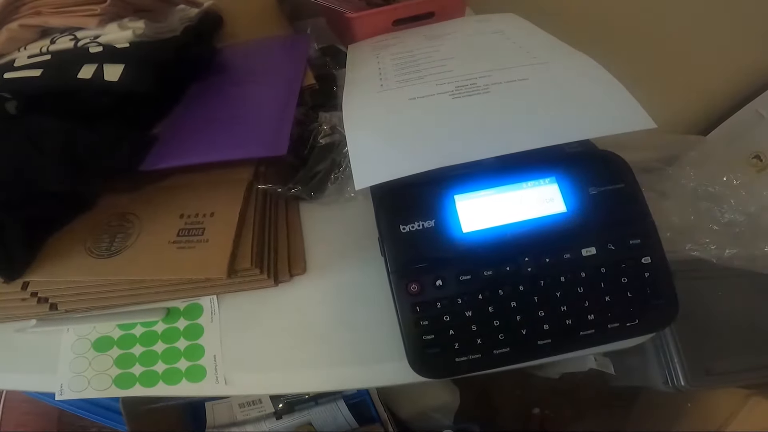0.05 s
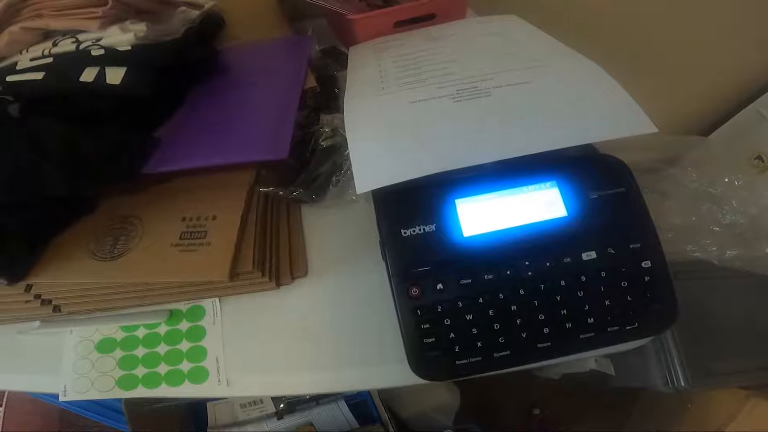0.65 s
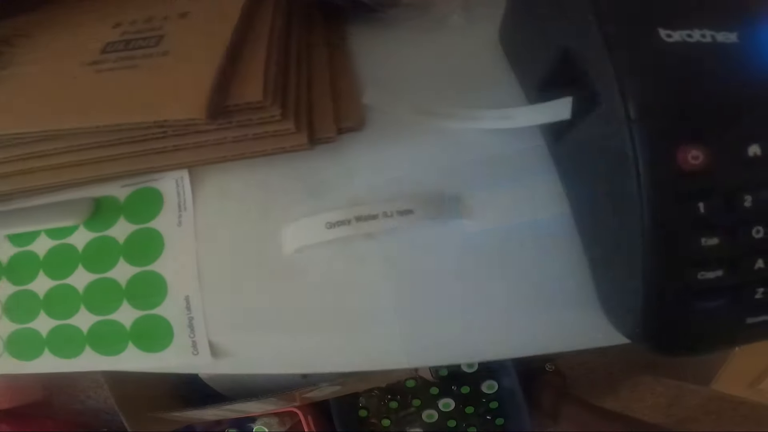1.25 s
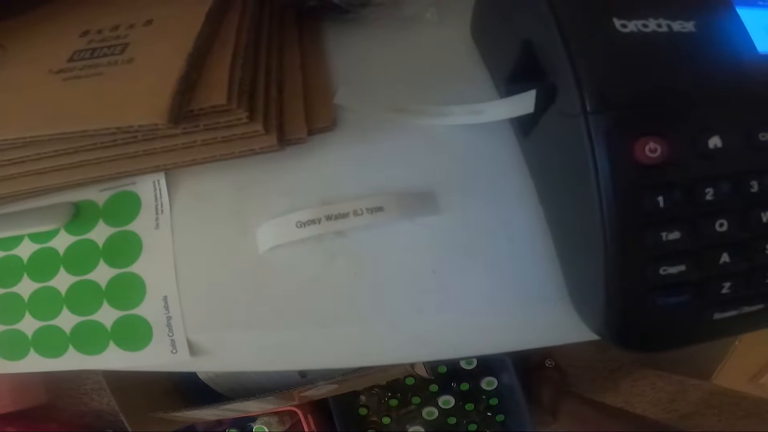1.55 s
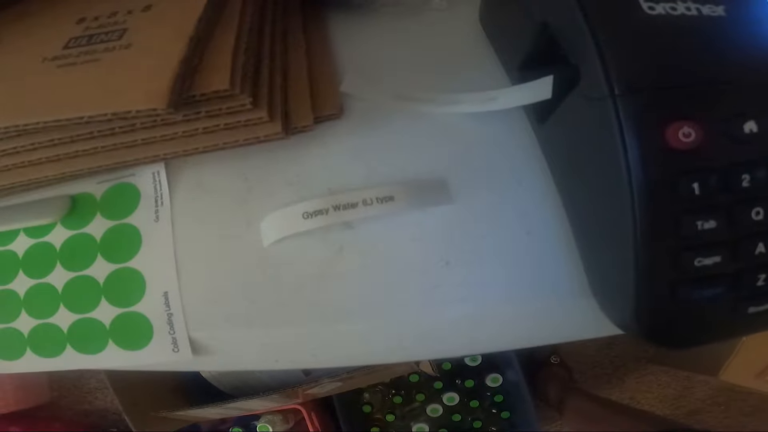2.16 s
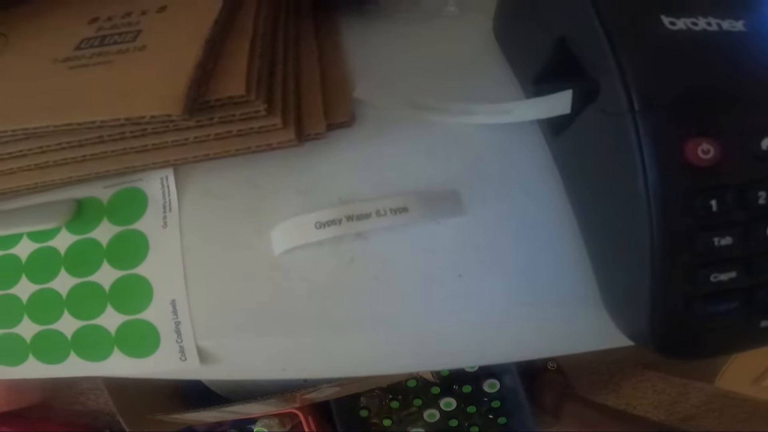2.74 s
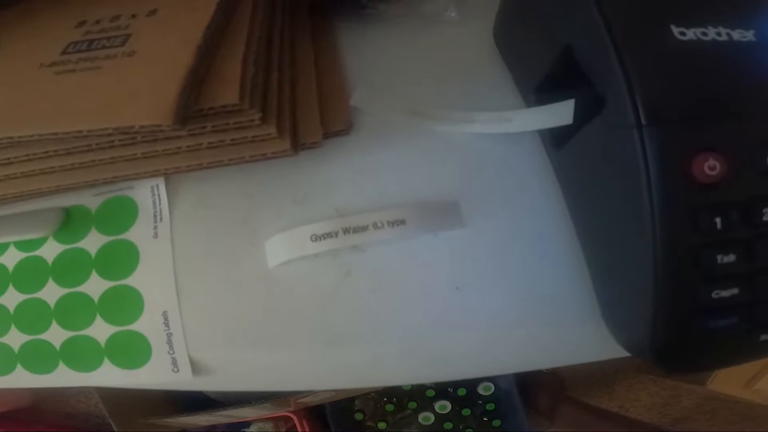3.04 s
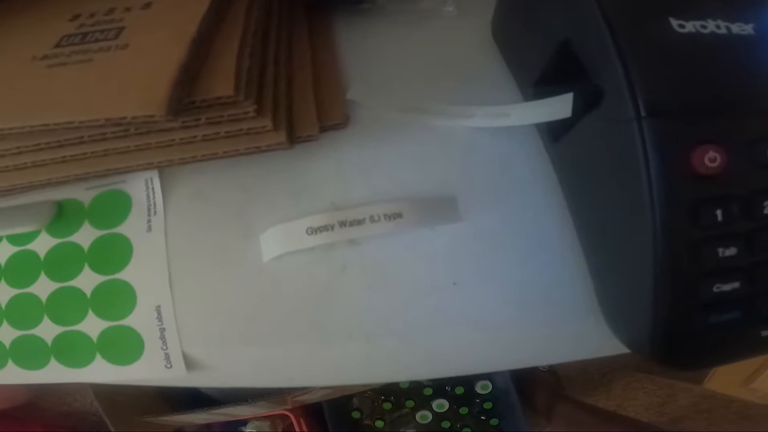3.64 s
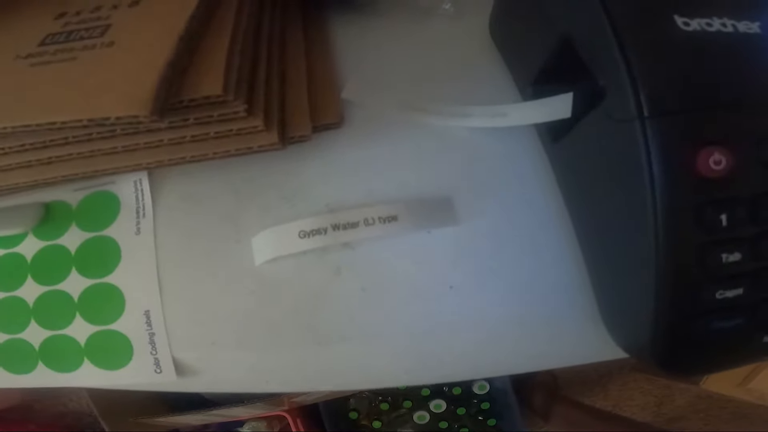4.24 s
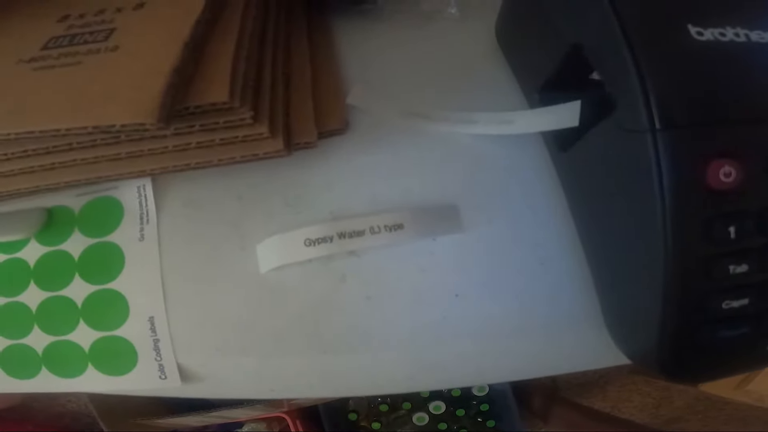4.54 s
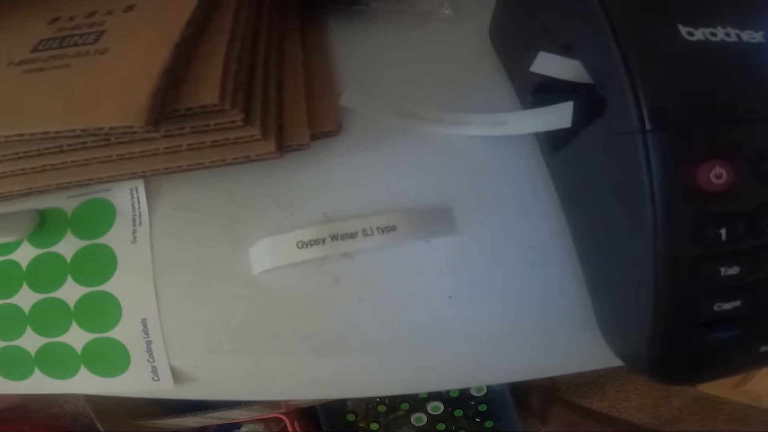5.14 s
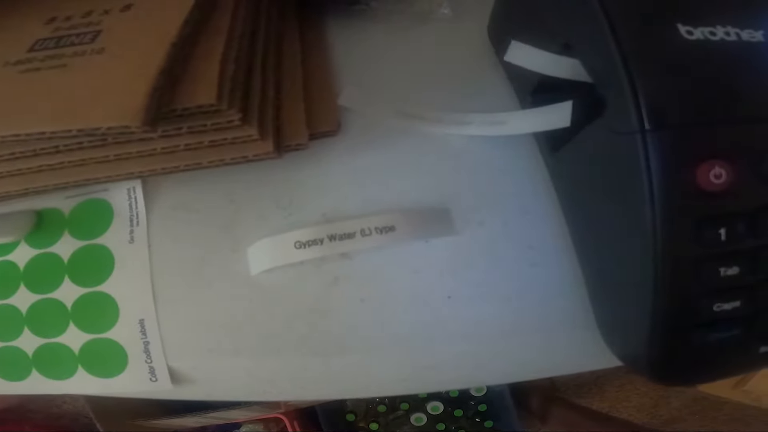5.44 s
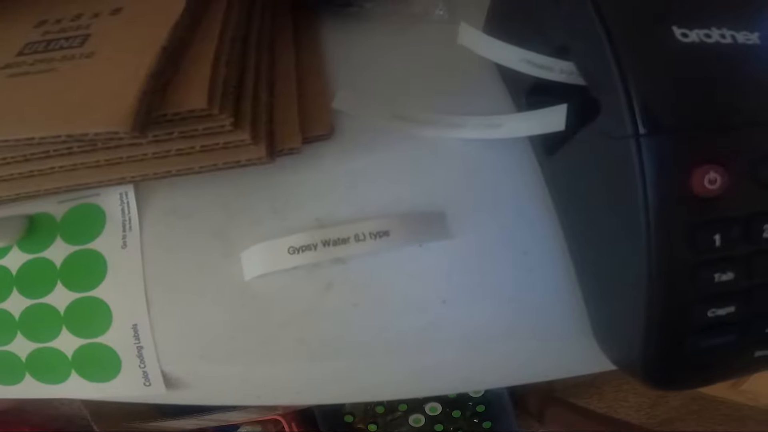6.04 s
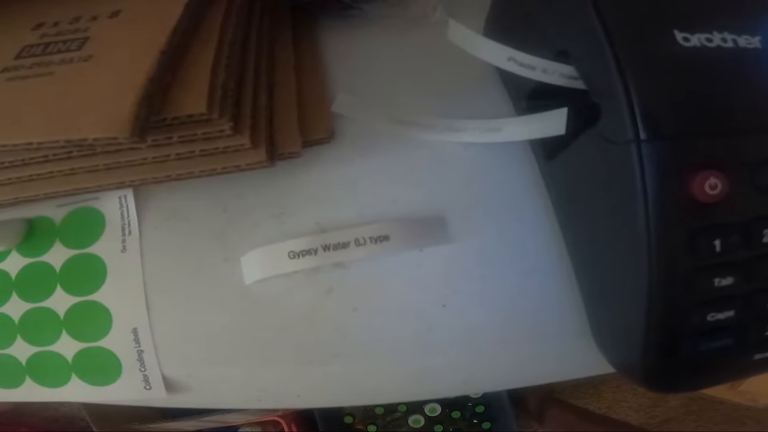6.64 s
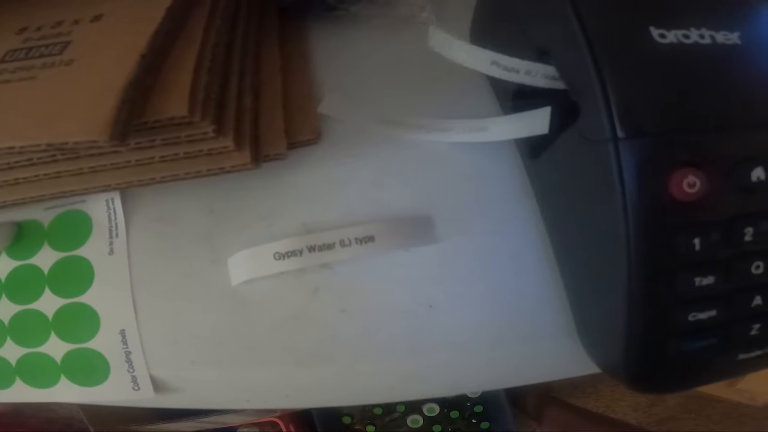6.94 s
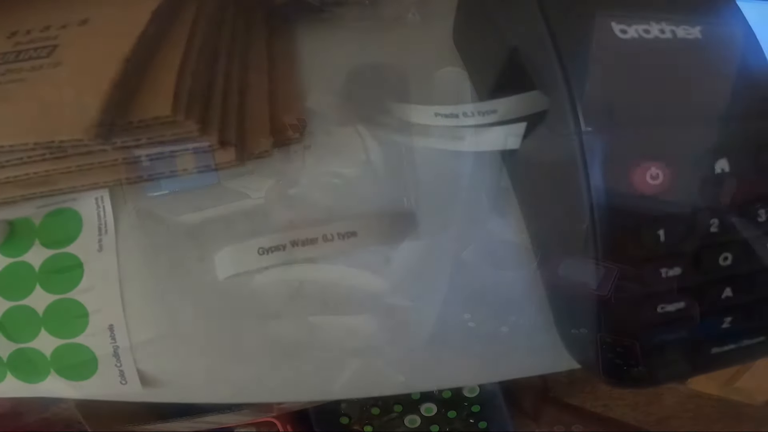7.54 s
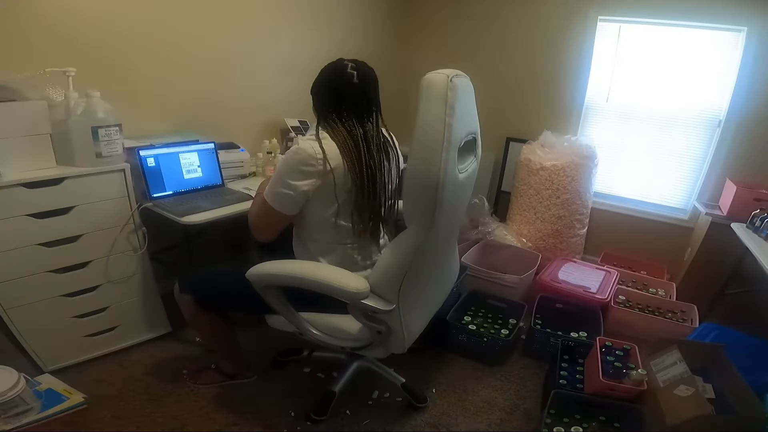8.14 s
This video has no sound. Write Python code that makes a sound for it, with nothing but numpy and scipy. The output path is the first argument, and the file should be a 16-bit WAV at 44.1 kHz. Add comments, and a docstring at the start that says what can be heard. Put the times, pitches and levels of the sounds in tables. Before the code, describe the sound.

After a click and two key presses, a label printer's motor whines steadily, then its cutter whirrs, squeaks and snaps through the tape.

```python
"""A desk in a small room, with a label printer on it. After a rustle and a sharp click, a key is pressed
and let go twice, thumping through case and desk. A stepper motor (one that turns in tiny steps) whines
the tape out, a little higher over the blank gaps. Then a geared motor whirrs the cutter along, and the
blade squeals through the tape and snaps back. A last rustle follows, over the faint air of the room."""
import sys
import numpy as np
from scipy import signal
from scipy.fft import rfft, irfft, next_fast_len
from scipy.io import wavfile

SR = 44100
rng = np.random.default_rng(int(sys.argv[2]) if len(sys.argv) > 2 else 0)


def output_pcm(signal):
    """Save a mono or channel-first signal as 16-bit PCM at the path in sys.argv[1].

    Samples are clipped to [-1, 1] before scaling.
    """
    pcm = np.clip(np.atleast_2d(signal).T, -1, 1) * 32767
    wavfile.write(sys.argv[1], SR, np.round(pcm).astype(np.int16))


N = 365588
T = np.arange(N) / SR

# the hiss of tape as it slides or tears: f/Hz, level/dB
TAPE_COLOUR = [(2940, -73), (5000, -1), (5490, -2.5), (5970, -2.5), (7680, -7), (8090, -10), (10000, -4),
               (10900, -13), (13600, -11.5), (15300, -40)]
PRESSES_S, RELEASES_S = [1.67, 2.265], [1.927, 2.529]   # the finger goes down and comes up
CUT_FROM_S, CUT_TO_S = 7.033, 7.099   # the blade goes through the tape


def feed():
    """The stepper sings one set of tones while printing, a higher one when free; gears and tape join in."""
    # the motor's tones under the print head's drag, and running free: f/Hz, level/dB
    print_tones = [(344.5, -62), (409.1, -59.5), (479.1, -59), (822.5, -49), (958.5, -58), (1438, -58),
                   (1647, -69), (2398.5, -47), (2878, -56), (3358, -61)]
    free_tones = [(425.3, -59), (495.3, -60), (822.5, -61), (990, -50.5), (1485, -47.5), (1696, -61.5),
                  (1976, -63.5), (2473, -51.5), (2967, -45.5), (3462, -54)]
    # blank stretches of the label, where the motor runs free: start/s, end/s
    blanks = [(3.84, 3.91), (4.376, 4.497), (4.955, 5.085), (5.553, 5.668), (5.9, 6.075), (6.28, 6.45)]
    start_s, stop_s, first_catch_s, turn_s = 3.856, 6.362, 3.995, .1552
    free = during(blanks, ramp_s=.028)
    running = held(start_s, stop_s, rise_s=.0064, fall_s=.0048)
    fed = progress(start_s, stop_s)   # share of the label that is out
    # the gears catch once a turn: the motor is held back, then makes up the lost way
    from_catch = ((T - first_catch_s + turn_s / 2) % turn_s - turn_s / 2) / .009
    catch = np.exp(-from_catch ** 2)
    print_speed = 1 + .021 * from_catch * catch
    # it starts a little too fast and brakes at the end
    starting = np.exp(-((T - start_s) / .0251) ** 2)
    braking = progress(stop_s - .05, stop_s)
    free_speed = 1 + .0501 * starting - .61 * braking
    tones = (1 - free) * whine(print_tones, print_speed, wobble=.0011, flutter_db=1.3, choke=catch)
    tones += free * whine(free_tones, free_speed, wobble=.0008, flutter_db=1.3, choke=catch / 2 + 3 * braking)
    tones *= from_db(-9 * starting - 2.4 * braking)   # off its running speed the motor sings less
    return running * tones + gears_and_tape(running, free, fed, catch)


def gears_and_tape(running, free, fed, catch):
    """The motor's steps rattle the gears and their plate; these and the tape grow louder as it feeds."""
    # the rattle of the gears: f/Hz, level/dB
    gear_colour = [(130, -16.5), (340, -7), (560, -6), (740, -13), (850, -6.5), (1050, -3), (1300, -6.5),
                   (1780, -2), (2150, -7.5), (2650, -4.5), (2900, 1), (3250, 2), (3680, -9), (4450, -6),
                   (5600, -24), (9000, -36.5)]
    # where the plate that holds the gears rings: f/Hz, width/Hz, level/dB
    plate_peaks = [(354.8, 29.5, -5), (864.6, 53, -0.5), (947, 41, 0.5)]
    steps = rms_one(scuff(contacts(per_s=480, jitter=.02, uneven_db=3.5), t60=.016))
    ticks = rms_one(scuff(contacts(per_s=62, jitter=.08, uneven_db=3.5), t60=.016))
    slack = from_db(-3) * held(3.776, 3.793, rise_s=.0089, fall_s=.0095)   # the gears take up their play
    turning = (running + slack) * from_db(2.5 * fed)
    gears = from_db(-50.5 + 4.5 * catch) * colour(steps + .38 * ticks, gear_colour)
    plate = from_db(-56 + 3 * free) * resonate(steps, plate_peaks, flicker_db=3.5)
    tape = from_db(-67.3 + 8 * fed ** 2) * colour(steps + 1.1 * ticks, TAPE_COLOUR)
    return turning * (gears + plate) + running * tape


def cutter():
    """Each turn of the motor shakes the cutter's parts, harder under load; gear teeth add grit."""
    # where the gears, lever, cover and blade guide ring: f/Hz, width/Hz, level/dB
    gear_peaks = [(103, 19, -10.5), (210, 30, -9.5), (334, 135, 1.5), (428, 21, -4), (525, 144, -2.5),
                  (590, 24, -18)]
    lever_peaks = [(728, 75, 0), (838, 48, 0), (950, 86, 1), (1190, 71, -14)]
    cover_peaks = [(2040, 140, 0.5), (2570, 490, -6.5), (4450, 350, -2), (4820, 300, -1)]
    guide_peaks = [(1195, 99, 2), (1424, 160, 0.5), (2950, 380, -7), (4300, 160, -6), (7000, 380, -14)]
    # the hiss of parts rubbing: f/Hz, level/dB
    friction_colour = [(820, -5.5), (1400, -1.5), (1850, -3.5), (2280, -6.5), (2730, -5), (3270, -8.5),
                       (4930, -12), (7070, -22), (8380, -30), (12400, -30.5), (15300, -44)]
    # pressing the blade in, then drawing it back: start/s, end/s, load (0 to 1), rise/s, fall/s
    pushes = [(7.055, 7.105, .95, .028, .012), (7.35, 7.429, .6, .028, .33)]
    on_s, off_s, idle_share, draw_back_s = 6.692, 7.8, .36, pushes[1][0]
    # the motor idles, drives the lever there and back, then coasts to rest
    engaged = held(6.79, 7.77, rise_s=.021, fall_s=.069)
    effort = held(on_s, off_s, rise_s=.012, fall_s=.059) * (idle_share + (1 - idle_share) * engaged)
    load = sum(share * held(a, b, rise, fall) for a, b, share, rise, fall in pushes)
    rotor_hz = 105.55 * (1 - .12 * load ** 4 + .012 * drift(6))   # it slows under load
    turns = contacts(per_s=rotor_hz, jitter=.01, uneven_db=2.5)
    teeth = contacts(per_s=3 * rotor_hz, jitter=.03, uneven_db=3)
    drive = (rms_one(turns) + .8 * rms_one(scuff(teeth, t60=.012))) * from_db(1.5 * drift(45))
    gears = from_db(-48.5 + 7.5 * load) * resonate(drive, gear_peaks)
    lever = from_db(-56.5 + 18 * load + 1.9 * drift(13)) * resonate(drive, lever_peaks)
    tremble = rms_one(cut(rng.standard_normal(N), hz=65, kind="low", order=3))
    desk = from_db(-61) * held(draw_back_s, off_s, rise_s=.35, fall_s=.19) * tremble
    cover = from_db(-58) * resonate(drive, cover_peaks, flicker_db=2.5)
    friction = from_db(-53.5) * colour(scuff(teeth, t60=.037), friction_colour)
    going_in = held(on_s, CUT_TO_S, rise_s=.01, fall_s=.13)   # the blade holder scrapes along its guide
    scrape = from_db(-53.5) * going_in * resonate(drive, guide_peaks, flicker_db=3)
    whirr = from_db(4 * load) * (cover + friction + scrape)
    return effort ** 1.08 * (gears + lever) + effort * whirr + desk


def blade_squeal():
    """The blade sticks and slips in the tape, ever slower as the load grows; the film tears and crunches."""
    # the tones of the squeal: multiple of the pitch, level/dB
    partials = [(1, -17), (2, 0), (3, -2), (4, -24)]
    # where the blade rings: f/Hz, width/Hz, level/dB
    blade_peaks = [(343, 110, -4), (597, 300, -5.5), (1150, 230, 1.5), (1530, 170, -5.5), (1850, 200, -4.5),
                   (3300, 470, -14), (7060, 860, -18)]
    start_hz, sag_hz, sag_s, bite_s = 924, 136, .042, .012
    pitch = start_hz - sag_hz * (1 - np.exp(-np.maximum(T - CUT_FROM_S, 0) / sag_s))
    phase = 2 * np.pi * np.cumsum(pitch * (1 + .022 * drift(250))) / SR
    tone = from_db(4 * drift(200)) * sum(from_db(db) * np.sin(k * phase) for k, db in partials)
    tearing = scuff(contacts(per_s=170, jitter=.35, uneven_db=1.5), t60=.031)
    hiss = from_db(-12.5 + 5 * progress(CUT_FROM_S, CUT_TO_S) ** 3) * colour(tearing, TAPE_COLOUR)
    crunch = resonate(tearing, blade_peaks)
    squealing = held(CUT_FROM_S, CUT_FROM_S, rise_s=.011, fall_s=.14)
    squealing *= held(0, CUT_TO_S, rise_s=1, fall_s=.004)   # it stops when the film parts
    biting = held(CUT_FROM_S + bite_s, CUT_TO_S, rise_s=.026, fall_s=.0044)
    return from_db(-39.5) * (squealing * tone + biting * (hiss + crunch))


def blade_snap():
    """Small plastic parts crack against each other as the blade snaps back."""
    # each snap: t/s, level/dB, brightness/dB per octave
    hits = [(7.1, -25, -1), (7.179, -17, 2), (7.181, -23, -4), (7.1864, -24.5, -2), (7.2587, -27, 0)]
    # the notes of the small parts: f/Hz, level/dB, ring time/s
    modes = [(1490, -7.5, 0.011), (1879, -3.5, 0.018), (2470, -12, 0.013), (3050, -11, 0.011),
             (3760, -7.5, .013), (5170, -5, 0.012), (5900, -5, 0.0057), (7270, -4, 0.0076),
             (8930, -9, .0063)]
    return snaps(hits, modes, crack_db=-14, top_hz=12500)


def knocks():
    """Key blows and inner jolts ring the case and desk; the plastic ticks, and buzzes under the finger."""
    # the key lands, hits bottom, pushes the printer into the desk and springs back:
    # t/s, case level/dB, desk level/dB, tick level/dB, centre/Hz
    key_blows = [(1.667, -25.5, -43.5, -44.5, 400), (1.6715, -14, -36.5, -51.5, 220),
                 (1.684, -23, -42, -45.5, 400), (1.702, -38, -31, -61.5, 85), (1.728, -36, -33, -56, 60),
                 (1.9275, -8.5, -28, -32, 200), (2.268, -21, -39, -59, 330),
                 (2.285, -26.5, -42.5, -60, 380), (2.3, -36, -33, -65, 70), (2.529, -11, -27, -34, 185),
                 (2.564, -20, -34, -49, 200)]
    # gears take up, the feed bumps and stops, the cutter hits its end stop:
    # t/s, case level/dB, tick level/dB, centre/Hz
    jolts = [(3.746, -44.5, -50, 260), (3.772, -37.5, -50, 221), (5.401, -25, -47, 520),
             (6.371, -39, -63, 240), (7.1011, -14, -33, 340), (7.11, -22, -39, 450)]
    # the notes of the case and of the desk top: f/Hz, level/dB, ring time/s
    case_modes = [(151, -4.5, 0.068), (232, 1, 0.041), (264, -2, .07), (339, -4, 0.05), (493, -11.5, 0.043),
                  (554, -14, 0.055), (748, -15, 0.033), (1096, -9.5, 0.022)]
    desk_modes = [(36, 0, .3), (57, -3, 0.52), (75.7, 1, 0.4), (98.5, -2, 0.21), (139.3, 2, 0.2),
                  (189, -3, 0.18), (272.2, 2, 0.17)]
    # where loose plastic buzzes: f/Hz, width/Hz, level/dB
    buzz_peaks = [(910, 350, 2.5), (1800, 830, 3.5), (3000, 470, -5), (4800, 1000, -11)]
    jolt_desk_db = -74   # little of a jolt reaches the desk
    blows = key_blows + [(s, case, jolt_desk_db, tick, hz) for s, case, tick, hz in jolts]
    times, case_db, desk_db, tick_db, centre_hz = np.transpose(blows)

    def strike(modes, levels):
        """A blow rings the notes near its centre pitch most."""
        ringing = 0
        for k, (hz, db, t60) in enumerate(modes):
            strength = levels + db - 2.5 * np.log2(hz / centre_hz) ** 2 + rng.normal(0, 1, len(times))
            ringing += (-1) ** k * ring(clicks_at(times, strength), hz, t60)
        return ringing

    case = cut(strike(case_modes, case_db - 1.5), hz=124, kind="high", order=3)
    desk = strike(desk_modes, desk_db)
    force = cut(clicks_at(times, tick_db + 8), hz=90, kind="low", order=1)   # the key gives over a few ms
    ticks = cut(scuff(force, t60=.058), hz=5640, kind="low", order=5)
    ticks = .5 * ticks + cut(ticks, hz=1110, kind="low", order=1)   # a fingertip is a soft striker
    ticks = cut(ticks, hz=400, kind="high", order=2)
    buzz = from_db(-101.5) * resonate(scuff(clicks_at(times, .5 * case_db), t60=.3), buzz_peaks)
    return case + desk + ticks + buzz + finger_rub(buzz_peaks)


def finger_rub(peaks):
    """The fingertip taps the key just before each press, rubs as it sinks and again as it lifts."""
    touch = sum(held(s - .031, s - .031, rise_s=.001, fall_s=.0049) for s in PRESSES_S)
    down = sum(held(s + .011, s + .02, rise_s=.011, fall_s=.065) for s in PRESSES_S)
    up = sum(held(s, s, rise_s=.011, fall_s=.0325) for s in RELEASES_S)
    level = from_db(-63.5) * touch + from_db(-56.5) * down + from_db(-53.5) * up
    return level * resonate(rng.standard_normal(N), peaks)


def key_squeak(hz=5560, level_db=-59):
    """Plastic sticks and slips on plastic for a moment before the key springs back."""
    lifting = during([(s - .018, s) for s in RELEASES_S], ramp_s=.0055)
    return lifting * whine([(hz, level_db)], 1 + .025 * drift(400), wobble=.011, flutter_db=1.5)


def handling_clicks():
    """A plastic thing clicks and rings as it is handled."""
    # each click: t/s, level/dB, brightness/dB per octave
    hits = [(0.083, -49, 12), (0.802, -13.5, -1), (0.878, -47, 10), (0.9595, -56, -9)]
    # the notes of the thing: f/Hz, level/dB, ring time/s
    modes = [(138, -9, .1), (775, -16, .04), (1680, -8, .017), (2050, -12, .014), (2720, -6, .011),
             (3130, -9, 0.013), (4130, -3, 0.0099), (5600, -5, .009), (6750, -7.5, .007), (7200, -8, 0.012)]
    return snaps(hits, modes, crack_db=-22.5, top_hz=10000)


def rustles():
    """Light stuff, such as paper or cloth, slides in small clumps at the start and again at the end."""
    # the movements, one list for each rustle: start/s, end/s, level/dB
    moves = [
        [(0.0, 0.055, -57), (.13, .192, -59.5), (.787, .8, -58.5), (.885, 0.93, -67)],
        [(8.022, 8.06, -57.5), (8.21, 8.28, -65)],
    ]
    # the tone of each rustle: f/Hz, level/dB
    colours = [
        [(530, -27), (900, -11.5), (1870, -10.5), (3060, -1), (3870, -4), (7670, -2), (12000, -17.5),
         (15000, -29.5)],
        [(350, -34), (600, -7), (852, -9), (1310, 2), (3270, -9.5), (6340, -7.5), (11900, -24.5),
         (15000, -51.5)],
    ]
    sliding = sum(strokes(rows, rise_s=.015, fall_s=.013) * diffuse(spectrum)
                  for rows, spectrum in zip(moves, colours))
    return sliding * from_db(-2 + 2 * drift(120)) * pan(db=-.5)


def hand_bump():
    """A hand bumps the left of the microphone and shifts on it."""
    # the bump and the shift: start/s, end/s, level/dB
    moves = [(.806, .818, -28), (.97, 1.025, -44)]
    # their dull thud: f/Hz, level/dB
    thud_colour = [(25, -9.5), (55, 2), (90, -8.5), (140, 1.5), (215, -20), (420, -18), (570, -30.5),
                   (800, -26)]
    return from_db(-2.5) * strokes(moves, rise_s=.0061, fall_s=.019) * diffuse(thud_colour) * pan(db=6.5)


def air():
    """The room rumbles and hisses faintly, slowly swelling and sinking."""
    # how loud the air is: t/s, level/dB
    levels = [(0, -77), (1.4, -74), (2.7, -81), (6.5, -78.5), (8.29, -73.5)]
    # the low rumble and the hiss: f/Hz, level/dB
    rumble_colour = [(20, 2), (43, -2.5), (70, -12.5), (110, -21.5), (145, -1.5), (215, -1), (260, -9.5),
                     (340, -11.5), (800, -29)]
    hiss_colour = [(600, -4), (1400, -1.5), (2400, -10.5), (6800, -14.5), (9400, -27.5), (12000, -39)]
    level = from_db(np.interp(T, *np.transpose(levels)))
    return level * (from_db(12.5) * diffuse(rumble_colour) + diffuse(hiss_colour))


def room(x, wet_db):
    """The walls add a short echo that dies band by band; both ears hear nearly the same bass."""
    # how long the room rings: f/Hz, ring time/s
    ring_times = [(100, .4), (300, 0.16), (900, .3), (1900, 0.15), (5000, 0.29), (12000, .18)]
    t, tail = T[:SR // 2], 0
    edges = np.geomspace(60, 16000, 9)
    for low, high in zip(edges, edges[1:]):
        hz = np.sqrt(low * high)
        mid, side = band(rng.standard_normal((2, len(t))), low, high)
        fade = from_db(-60 * t / at_hz(ring_times, hz)) * (t > .003)
        width = hz / (hz + 700)
        ears = (mid + width * side * [[1], [-1]]) / np.hypot(1, width)
        tail += ears * fade / np.linalg.norm(fade)
    return x + from_db(wet_db) * signal.fftconvolve(x[None], tail, axes=1)[:, :N]


def whine(tones, speed, wobble, flutter_db, choke=0):
    """Tones share one uneven speed and each flutters in level; choking dims the high ones most."""
    clock = np.cumsum(speed + wobble * drift(30)) / SR
    total = 0
    for hz, db in tones:
        gain = from_db(db + flutter_db * drift(10.3) - 4.8 * choke * hz / 1000)
        total += np.sqrt(2) * gain * np.sin(2 * np.pi * (hz * clock + rng.random()))
    return total


def snaps(hits, modes, crack_db, top_hz):
    """Plastic snaps: a crack of noise and a few short notes, each hit with its own brightness."""
    times, level, tilt = np.transpose(hits)
    total = scuff(clicks_at(times, level + crack_db), t60=.012)
    for k, (hz, db, t60) in enumerate(modes):
        brightness = tilt * np.log2(max(hz, 1000) / 4000)
        strength = level - 5.5 + db + brightness + rng.normal(0, .93, len(times))
        total += (-1) ** k * ring(clicks_at(times, strength), hz, t60)
    return cut(total, hz=top_hz, kind="low", order=4)


def contacts(per_s, jitter, uneven_db):
    """Nearly regular clicks of uneven strength, as when gear teeth meet."""
    count = np.floor(np.cumsum(per_s * (1 + jitter * drift(40))) / SR)
    return (np.diff(count, prepend=0) > 0) * from_db(uneven_db * np.clip(rng.standard_normal(N), -2, 2))


def clicks_at(times, db):
    """Single clicks at given times and levels."""
    return np.bincount(np.round(times * SR).astype(int), from_db(db), N)[:N]


def scuff(clicks, t60):
    """Each click starts a puff of noise that fades by 60 dB in t60 seconds."""
    fade = signal.lfilter([1], [1, -from_db(-60 / (t60 * SR))], clicks + 1e-18)
    return fade * rng.standard_normal(N)


def ring(clicks, hz, t60):
    """Each click starts a pure note; its ring time t60 is the seconds it takes to fade by 60 dB."""
    decay, angle = from_db(-60 / (t60 * SR)), 2 * np.pi * hz / SR
    return signal.lfilter([0, np.sin(angle)], [1, -2 * decay * np.cos(angle), decay ** 2], clicks + 1e-18)


def resonate(x, peaks, flicker_db=0):
    """Keep the bands where a part rings; with flicker, each swells and fades by itself."""
    total = 0
    for hz, width, db in peaks:
        flicker = flicker_db * drift(12) if flicker_db else 0
        total += from_db(db + flicker) * band(x, hz - width / 2, hz + width / 2)
    return rms_one(total)


def diffuse(spectrum):
    """Noise from all around: alike in both ears in the bass, less so in the treble."""
    # how alike the two ears are: f/Hz, likeness (0 to 1)
    likeness = [(60, 1), (180, 0.39), (1640, 0.47), (4920, 0.26)]
    mid, side = rfft(rng.standard_normal((2, next_fast_len(N))))
    alike = np.clip(at_hz(likeness, np.linspace(0, SR / 2, len(mid))), 0, 1)
    ears = irfft(np.sqrt(1 + alike) * mid + np.sqrt(1 - alike) * side * [[1], [-1]])
    return colour(ears[:, :N], spectrum)


def colour(x, spectrum):
    """Shape a sound's lows and highs by a table, fading away beyond the table's ends."""
    size = next_fast_len(N)
    hz = np.arange(size // 2 + 1) * SR / size + .0013
    outside = np.maximum(1, np.maximum(spectrum[0][0] / hz, hz / spectrum[-1][0]))
    gain = from_db(at_hz(spectrum, hz)) / outside ** 2
    return rms_one(irfft(rfft(x, size) * gain, size)[..., :N])


def band(x, low, high):
    """Keep what lies between two frequencies."""
    return signal.sosfilt(signal.butter(2, [low, high], "band", fs=SR, output="sos"), x)


def cut(x, hz, kind, order):
    """Keep the "low" or the "high" side of a frequency."""
    return signal.sosfilt(signal.butter(order, hz, kind, fs=SR, output="sos"), x)


def drift(rate):
    """A smooth random wander of typical size 1; a higher rate wanders faster."""
    decay = np.exp(-80 * np.pi * rate / SR)
    slow = signal.lfilter([1], [1, -2 * decay, decay ** 2], rng.standard_normal(N // 40 + 2002))[2000:]
    return np.interp(np.arange(N) / 40, np.arange(len(slow)), rms_one(slow))


def held(start, stop, rise_s, fall_s):
    """A level that swells up to 1 at start, holds until stop and dies away."""
    return np.exp(-np.clip(np.maximum((start - T) / rise_s, (T - stop) / fall_s), 0, 30))


def strokes(rows, rise_s, fall_s):
    """One level curve with a swell for each row of start/s, end/s, level/dB."""
    return sum(from_db(db) * held(a, b, rise_s, fall_s) for a, b, db in rows)


def during(spans, ramp_s):
    """1 inside the spans, 0 outside, with short ramps."""
    return sum(np.clip(np.minimum(T - a, b - T) / ramp_s + .5, 0, 1) for a, b in spans)


def progress(start, stop):
    """Climb evenly from 0 at start to 1 at stop."""
    return np.clip((T - start) / (stop - start), 0, 1)


def at_hz(points, hz):
    """Read between a table's rows, with every octave equally wide."""
    freqs, values = np.transpose(points)
    return np.interp(np.log(np.maximum(hz, 1)), np.log(freqs), values)


def pan(db):
    """Gains of the two ears, the left louder by db."""
    return from_db(np.array([[db], [-db]]) / 2)


def from_db(db):
    """Turn decibels into a gain."""
    return np.exp(np.asarray(db) * (np.log(10) / 20))


def rms_one(x):
    """Scale a sound to an average strength (rms) of 1."""
    return x / np.sqrt(np.mean(x ** 2) + 1e-20)


def scene():
    """All the sounds meet in the room, with the feed and the cutter slightly to the right."""
    clicks = handling_clicks()
    snap = blade_snap()
    blows = room(knocks() + key_squeak(), wet_db=-8.5) + room(clicks, wet_db=-15.5)
    feeding = room(feed(), wet_db=-17)
    cutting = room(cutter() + blade_squeal() + snap, wet_db=-11.5)
    left, right = (feeding + cutting) * pan(db=-1.55)
    motors = np.array([np.roll(left, 1), right])   # the left ear hears them one sample later
    return blows + motors + rustles() + hand_bump() + air()


def record(dry):
    """The sound narrows to the middle, slowly widens again and drops out twice; the top treble is cut."""
    # how wide the sound is: t/s, width (0 to 1)
    widths = [(0, 1), (1.05, 1), (1.25, .02), (3.6, .02), (4.5, .6), (5.7, 1), (8.29, 1)]
    # where the sound drops out: start/s, end/s
    silences = [(1.021, 1.29), (7.961, 8.009)]
    top_hz = 15000
    mid = dry.mean(axis=0)
    narrowed = mid + np.interp(T, *np.transpose(widths)) * (dry - mid)
    audible = 1 - during(silences, ramp_s=.016)
    return signal.sosfilt(signal.ellip(10, .1, 80, top_hz, fs=SR, output="sos"), narrowed * audible)


dry = scene()
out = record(dry)
output_pcm(out)
```